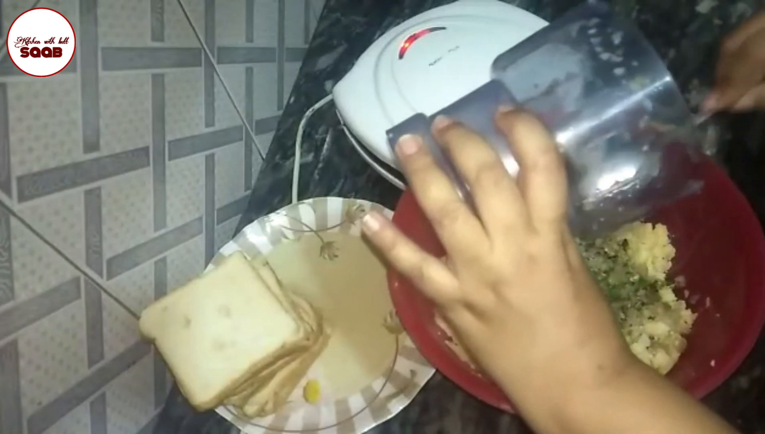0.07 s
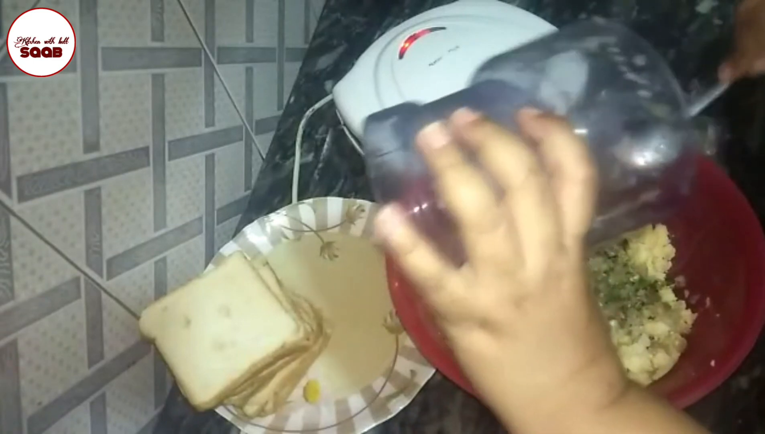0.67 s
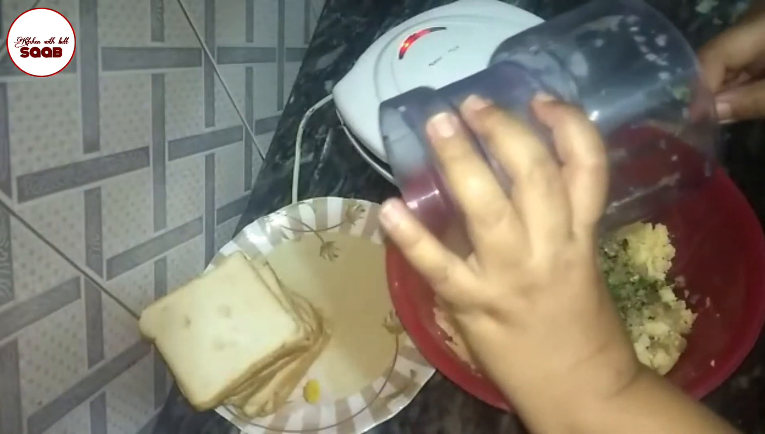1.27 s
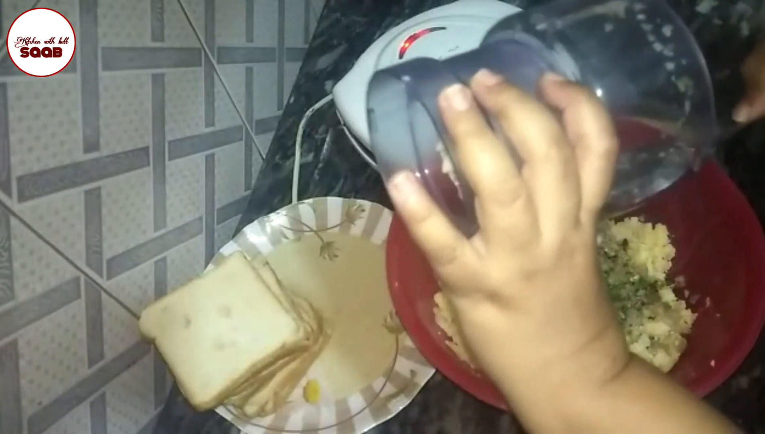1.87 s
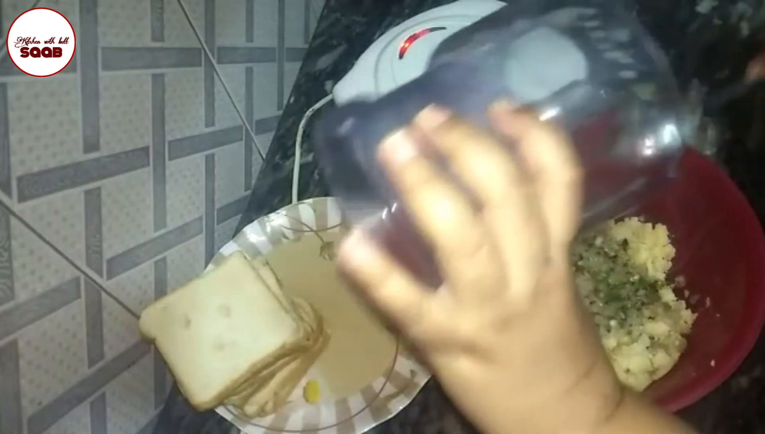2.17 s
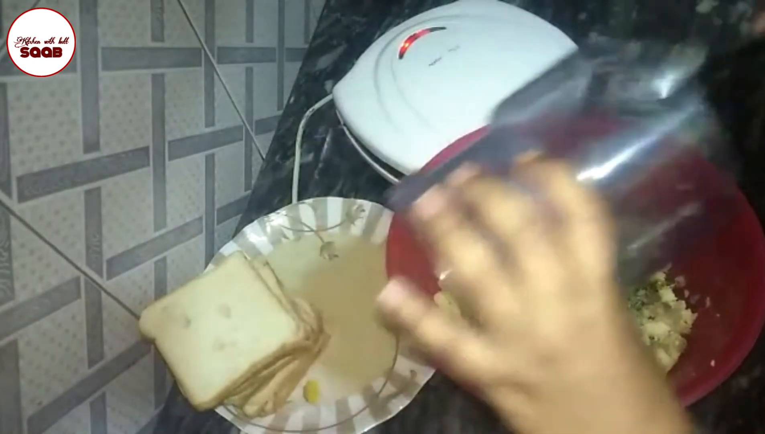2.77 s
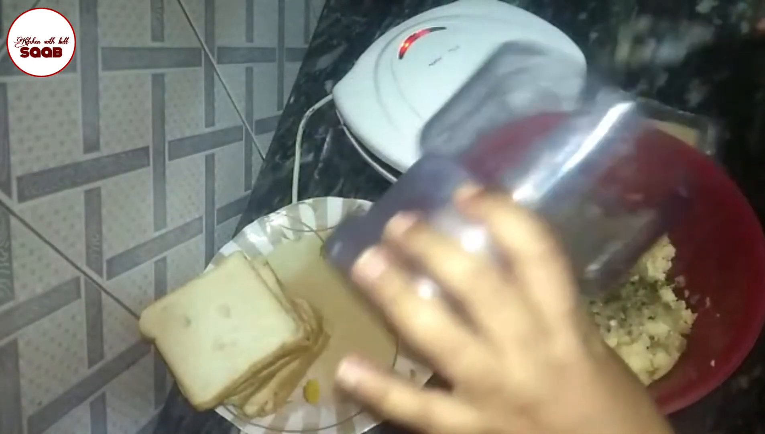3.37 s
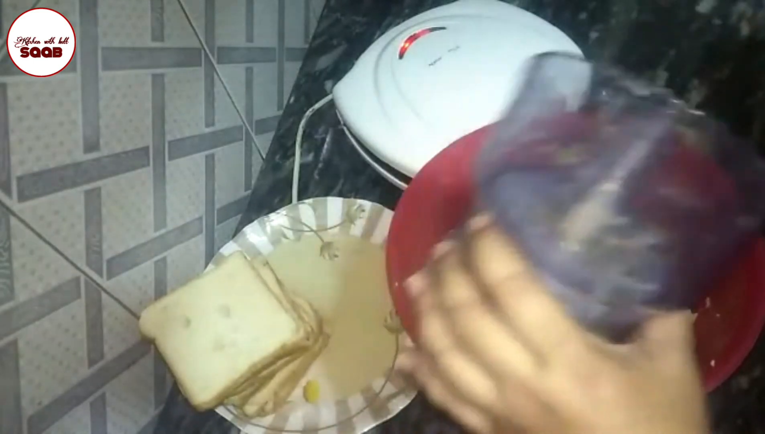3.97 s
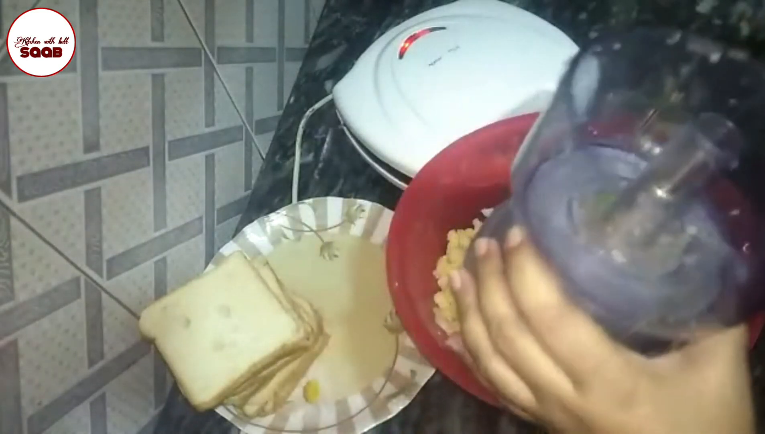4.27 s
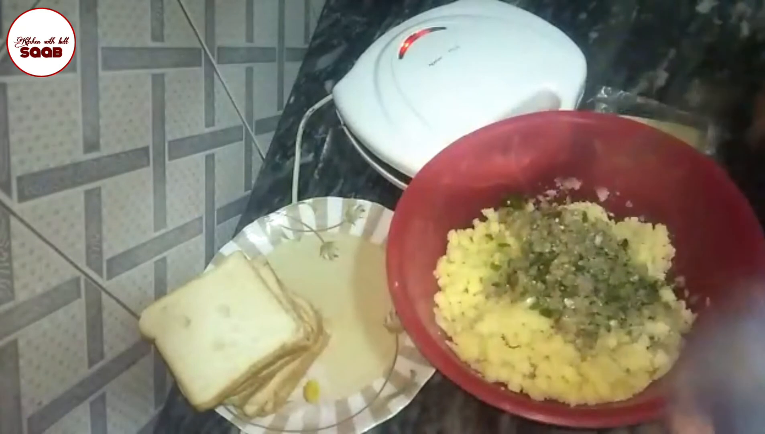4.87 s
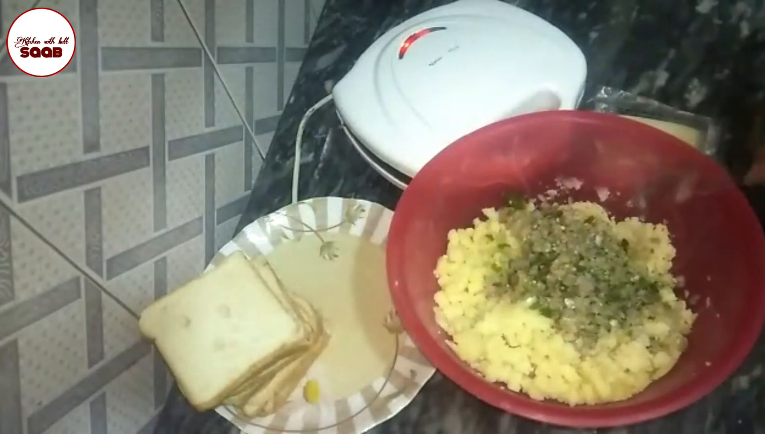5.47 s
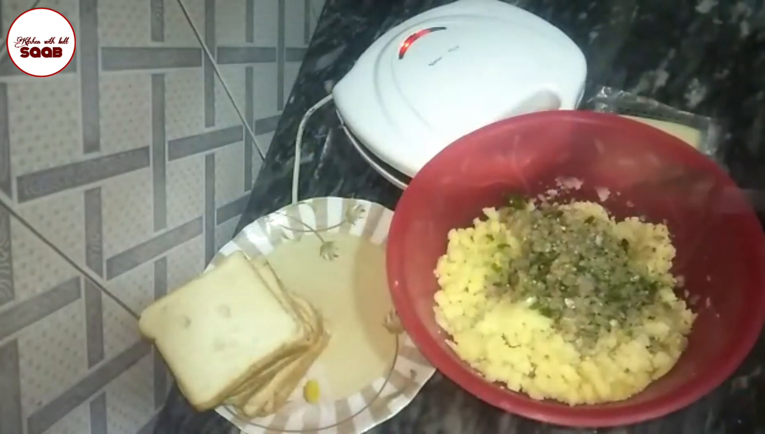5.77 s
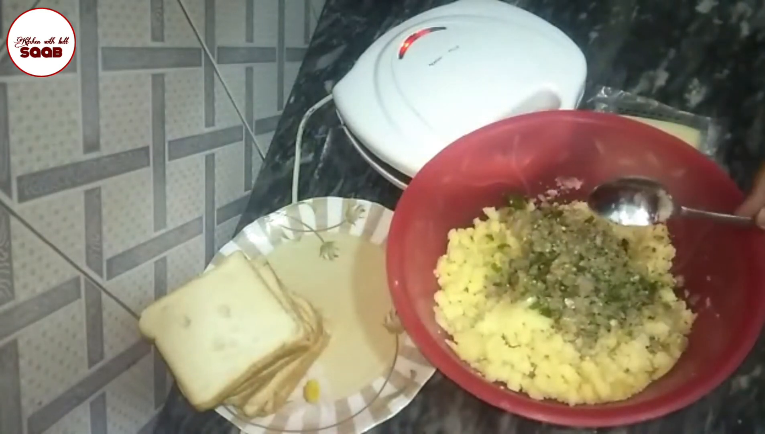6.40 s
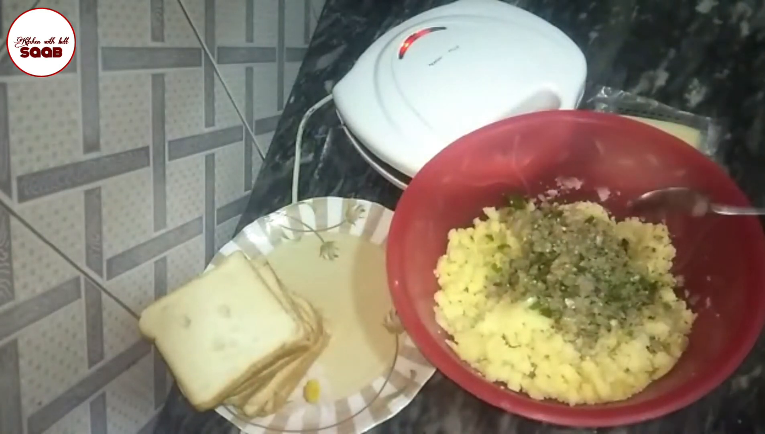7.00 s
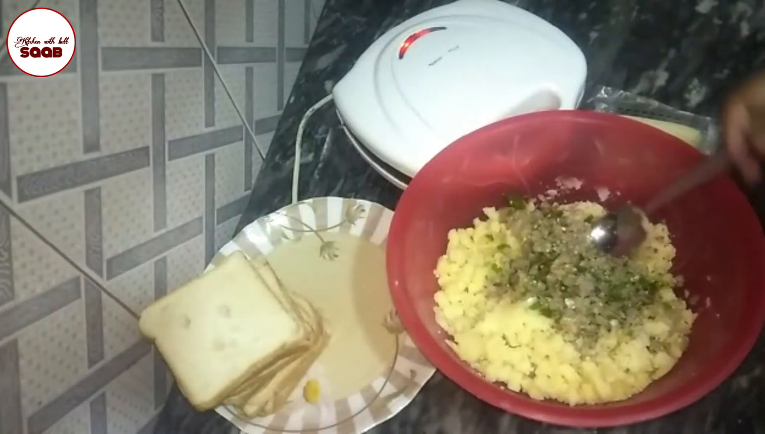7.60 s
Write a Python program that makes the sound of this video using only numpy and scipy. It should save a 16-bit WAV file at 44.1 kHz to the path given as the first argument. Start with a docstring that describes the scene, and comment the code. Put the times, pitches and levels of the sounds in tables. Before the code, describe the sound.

Over a soft hum, a metal spoon clicks and scrapes in a plastic jar, followed by a quick run of hollow knocks.

```python
"""A small tiled kitchen hums throughout. A steel spoon scrapes and clicks inside a plastic blender
jar, scooping paste into a bowl; near 3 s it clacks on the jar's lip and squeaks. From 5 s the jar is
knocked down six times to shake the rest loose, rebounding after each blow. Its rim taps, two more
knocks follow, and one faint scrape ends the scene. The right microphone port (its opening) is
covered, so that side sounds dull."""
import sys
import numpy as np
from scipy import signal
from scipy.fft import rfft, irfft, next_fast_len
from scipy.io import wavfile

SR = 44100
rng = np.random.default_rng(int(sys.argv[2]) if len(sys.argv) > 2 else 0)


def master_out(mix):
    """Clip the mix to full scale and print it as 16-bit PCM to the path in sys.argv[1]."""
    frames = np.transpose(np.atleast_2d(mix))
    ceiling = np.clip(frames, -1, 1)
    pcm = np.round(ceiling * 32767).astype(np.int16)
    wavfile.write(sys.argv[1], SR, pcm)


N = 336924


def from_db(db):
    """Turn decibels into a number to multiply by."""
    return 10 ** (np.asarray(db) / 20)


def rms_one(x):
    """Scale a signal so its average power is one."""
    return x / np.sqrt(np.mean(x ** 2) + 1e-20)


def at_hz(points, hz):
    """Read between a table's rows, giving every octave equal room."""
    pitches, values = np.transpose(points)
    return np.interp(np.log(np.maximum(hz, 1)), np.log(pitches), values)


def colour(x, spectrum):
    """Make each pitch louder or softer, following rows of pitch_hz, level_db."""
    size = next_fast_len(x.shape[-1])
    gain = from_db(at_hz(spectrum, np.arange(size // 2 + 1) * SR / size))
    return irfft(rfft(x, size) * gain, size)[..., :x.shape[-1]]


def lowpass(x, hz, order=1):
    """Dull a sound by turning down what lies above hz."""
    return signal.sosfilt(signal.butter(order, min(hz, SR / 2 - 100), fs=SR, output="sos"), x + 1e-18)


def delay(x, delay_s):
    """Make a sound arrive later."""
    i = np.arange(len(x))
    return np.interp(i - delay_s * SR, i, x, left=0)


def add(out, start_s, sound):
    """Mix a sound in at its start time."""
    i = max(round(start_s * SR), 0)
    out[i:i + len(sound)] += sound[:N - i]


def ring(tones, detune=0, scatter_db=1.5):
    """A struck thing's tones, varied with each touch; each falls 60 dB in its fade_s."""
    out = np.zeros(SR // 2)
    for hz, level_db, fade_s in tones:
        t = np.arange(min(int(fade_s * SR), len(out))) / SR
        strength, shift = rng.standard_normal(2)
        loudness = from_db(level_db + scatter_db * strength - 60 * t / fade_s)
        out[:len(t)] += loudness * np.cos(2 * np.pi * hz * (1 + detune * shift) * t)
    return out * np.cos(np.linspace(0, np.pi / 2, len(out)))


def burst(spectrum, fade_s, size=2048):
    """Overtones too many to count, made as a quickly dying puff of noise."""
    fade = from_db(-60 * np.arange(size) / SR / fade_s)
    noise = rfft(rng.standard_normal(size) * fade)
    even = irfft(noise / (np.abs(noise) + 1e-9), size) * np.sqrt(fade)   # evens out the pitches
    return colour(np.pad(even, (0, SR // 2 - size)), spectrum) * np.linspace(1, 0, SR // 2)


def wander(width_hz):
    """A smooth random wobble, as complex numbers; wider means faster."""
    smoothing = signal.butter(2, width_hz / 2, fs=SR, output="sos")
    slow = signal.sosfilt(smoothing, rng.standard_normal((2, N + SR)))[:, SR:]
    return (rms_one(slow[0]) + 1j * rms_one(slow[1])) / np.sqrt(2)


def wavering_tone(cycles, width_hz):
    """A tone of unsteady strength and pitch; cycles counts its vibrations so far."""
    return rms_one((wander(width_hz) * np.exp(2j * np.pi * cycles)).real)


def slips(size, per_s, spread_db):
    """Sticking and slipping: tiny random kicks of uneven strength."""
    chance, sign, strength = rng.random(size), rng.choice([-1, 1], size), rng.standard_normal(size)
    return (chance < per_s / SR) * sign * from_db(spread_db * strength)


# Mains hum (first row), then the fan's tones: pitch_hz, width_hz, level_db
HUM_TONES = [(100.1, 0.58, -44), (121.3, 7.1, -48.5), (175.5, 9.6, -42), (287.6, 10, -51.5),
             (320.8, 10.7, -46.5)]
# The rush of the kitchen's air: pitch_hz, level_db_per_hz
AIR_SPECTRUM = [(30, -66), (50, -75), (65, -76.5), (90, -73), (130, -65), (190, -69.5), (310, -65.5),
                (450, -76.5), (720, -73.5), (1500, -82), (2200, -83.5), (5500, -100), (8200, -99),
                (10000, -117)]


def kitchen_hum(fall_start_s=2.06, fall_length_s=0.17, fall_db=5.5, side_db=-9, waver=0.35):
    """Mains electricity hums, air rushes softly, and a fan's drone settles to a lower level."""
    t = np.arange(N) / SR
    (mains_hz, mains_width_hz, mains_db), *fan_tones = HUM_TONES
    swell = 1 + waver * wander(mains_width_hz).real
    mains = from_db(mains_db) * rms_one(swell * np.sin(2 * np.pi * mains_hz * t))
    fan = sum(from_db(db) * wavering_tone(hz * t, width_hz) for hz, width_hz, db in fan_tones)
    settled = np.clip((t - fall_start_s) / fall_length_s, 0, 1)
    middle, side = colour(rng.standard_normal((2, N)), AIR_SPECTRUM) * np.sqrt(SR / 2)
    air = middle + from_db(side_db) * side * [[1], [-1]]
    return mains + fan * from_db(-fall_db * settled) + air


# The clear tones of the jar's wall: pitch_hz, level_db, fade_s
WALL_TONES = [(842, -30.5, 0.039), (944, -28, 0.028), (975, -60, 0.05237), (1460, -34, 0.048),
              (2455, -26, 0.043), (3470, -10, 0.023), (3950, -16, 0.017), (4880, -22.5, 0.037),
              (5390, -14.5, 0.025), (6800, -90, 0.021), (7770, -19.5, 0.047), (8540, -27, 0.065)]
# The wall's crowd of short overtones: pitch_hz, level_db
WALL_SPECTRUM = [(200, -26), (550, -14), (1000, -2), (1500, -4), (2000, 3), (2500, -2.5), (3400, 12),
                 (5000, 4), (6500, 8.5), (8500, 3.5), (10500, -9), (16000, -6)]


def jar_wall(tones_db, detune, burst_s):
    """The thin wall answers one kick; every spot rings a little differently."""
    return from_db(tones_db) * ring(WALL_TONES, detune) + burst(WALL_SPECTRUM, burst_s)


# The spoon drawn along the wall: start_s, length_s, level_db
SCRAPES = [(0.0, 0.035, -41.5), (0.25, 0.39, -51), (0.312, 0.043, -37.5), (0.451, 0.18, -44.5),
           (1.047, .05, -63), (1.38, 0.21, -44), (1.442, .04, -30.5), (1.464, 0.014, -26.5),
           (1.934, 0.18, -45.5), (2.045, 0.028, -38), (3.04, 0.11, -69), (7.484, 0.022, -51.5)]


def spoon_scrapes(press_s=0.014, release_s=0.03, grit_db=1.5, catch_db=1.5):
    """Pressure builds, holds and lets go while fine slips, catching and freeing, shake the wall."""
    out = np.zeros(N)
    kicks = slips(N, per_s=3200, spread_db=4)
    force = rms_one(kicks * from_db(grit_db * wander(200).real + catch_db * wander(54).real))
    for start_s, length_s, level_db in SCRAPES:
        rub = force[max(round(start_s * SR), 0):][:SR // 3]
        t = np.arange(len(rub)) / SR
        pressure = np.clip(t / press_s, 0, 1) * np.clip(1 - (t - length_s) / release_s, 0, 1)
        wall = jar_wall(tones_db=-11, detune=0.0375, burst_s=0.045)
        scrape = signal.fftconvolve(rub * pressure, wall / np.linalg.norm(wall))
        add(out, start_s, from_db(level_db) * scrape)
    return out


def stutter(length_s):
    """The push of a landing spoon: a dying run of slips."""
    t = np.arange(SR // 20) / SR
    return slips(len(t), per_s=4600, spread_db=2.0) * np.exp(-(t / length_s) ** 2)


# The spoon hitting the wall: start_s, level_db, stutter_s, brightness_db
SPOON_HITS = [(0.199, 9.5, 0.014, -2.5), (0.2214, 7, 0.013, -10), (0.232, 1, 0.012, -11),
              (0.247, 3, 0.0033, -26), (0.9972, 9, 0.006, -5), (1.213, -12.5, 0.0085, -1),
              (1.321, -8, 0.0077, -23), (1.396, -7.5, 0.0017, -40), (1.418, -1, 0.0025, -30),
              (1.492, 9.5, 0.0017, 1.5), (1.8857, 10.5, 0.005, 1.5), (1.9025, 5, .014, -4.5),
              (2.101, -3, 0.005, 20), (3.005, -7, 0.016, -53)]


def spoon_clicks(thud_hz=1200, treble_hz=4500, thud_db=3.5, thud_per_dull_db=0.45):
    """The spoon lands on the wall: its bare edge clicks brightly, but cushioned by paste it thuds."""
    out = np.zeros(N)
    for start_s, level_db, stutter_s, brightness_db in SPOON_HITS:
        wall = jar_wall(tones_db=-5, detune=0.028, burst_s=0.036)
        click = signal.fftconvolve(stutter(stutter_s), wall)
        thud = lowpass(click, thud_hz, order=2)
        treble = click - lowpass(click, treble_hz)
        thud_gain = from_db(thud_db - thud_per_dull_db * brightness_db)
        click = click + (thud_gain - 1) * thud + (from_db(brightness_db) - 1) * treble
        add(out, start_s, from_db(level_db) * click / np.linalg.norm(click))
    return out


# The clear tones of the jar's lip: pitch_hz, level_db, fade_s
LIP_TONES = [(1110, -15, 0.041), (2050, 3.5, 0.052), (2490, -1, 0.028), (3340, -3, 0.021), (5340, 1, 0.02),
             (6540, 3, 0.013)]
# The lip's crowd of short overtones: pitch_hz, level_db
LIP_SPECTRUM = [(200, -5), (600, 29), (1000, 23), (2100, 37.5), (3500, 18), (6000, 34), (8500, 21),
                (10500, -7), (16000, -14)]


def lip_clack(start_s=3.023, level_db=6):
    """On its way out the spoon hits the stiff lip: a lower, drier clack."""
    out = np.zeros(N)
    push = stutter(length_s=0.0037)
    clack = signal.fftconvolve(push, ring(LIP_TONES) + burst(LIP_SPECTRUM, fade_s=0.023))
    add(out, start_s, from_db(level_db) * clack / np.linalg.norm(clack))
    return out


def spoon_squeak(start_s=3.141, length_s=0.044, level_db=-31, pitch_hz=7430, fall_hz_per_s=43000):
    """The slips of the spoon's edge lock into a rough, falling whistle that swells and dies."""
    t = np.clip(np.arange(N) / SR - start_s, 0, length_s)
    hz = pitch_hz - fall_hz_per_s * t
    whistle = wavering_tone(np.cumsum(hz) / SR, width_hz=1689.5)
    return whistle * from_db(level_db) * np.sin(np.pi * t / length_s) ** 2


# The noise of jar meeting counter: pitch_hz, level_db
CRACK_SPECTRUM = [(60, 8.5), (300, 27), (600, 18), (1000, 19.5), (1400, 5), (2000, 14.5), (2700, 9.5),
                  (3500, 15.5), (5000, 11), (8500, 14), (10500, -1), (16000, -3)]


def jar_crack(fade_s):
    """The sharp crack at the moment the jar lands."""
    return burst(CRACK_SPECTRUM, fade_s)


# The jar knocked down: start_s, level_db, rebound_after_s, rebound_db
JAR_BLOWS = [(4.9712, -11, .012, -15.5), (5.1512, 0, 0.039, -14.5), (5.3515, 0.5, 0.035, -6.5),
             (5.5178, 0, 0.028, -7), (5.696, 0, 0.028, -10), (5.8572, -2, .0355, -10.5),
             (6.8065, 0, 0.039, -8), (7.0299, -1, .027, -9.5)]
# The tones of the jar's base and the counter: pitch_hz, level_db, fade_s
BASE_TONES = [(95.3, -23, 0.24), (121.9, -21.5, 0.36), (175, -39.5, 0.96), (207, -27, 0.11),
              (283.7, -26, 0.36), (307, -28.5, 0.55), (407, -59, 0.059), (558.6, -30, 0.39),
              (588, -28.5, .2), (709, -11, 0.059), (730, -17.5, 0.058), (780, -9.5, 0.043),
              (928, -22, 0.063), (1018, -20, 0.036), (1550, -55, 0.013), (1830, -25.5, 0.052),
              (2030, -34, 0.025), (3250, -29, 0.025)]


def jar_knocks(crack_db=0.5, top_hz=13200, top_hz_per_db=620, rebound_hz=1000, rebound_crack_db=9):
    """A crack, brighter for harder blows, and a hollow thump; then a softer, duller rebound."""
    out = np.zeros(N)
    for start_s, level_db, rebound_after_s, rebound_db in JAR_BLOWS:
        crack = lowpass(jar_crack(fade_s=0.026), top_hz + top_hz_per_db * level_db, order=2)
        thump = ring(BASE_TONES, detune=0.0062)
        add(out, start_s, from_db(level_db) * (from_db(crack_db) * crack - thump))
        rebound = from_db(rebound_crack_db) * jar_crack(fade_s=0.012) - ring(BASE_TONES, detune=0.03)
        add(out, start_s + rebound_after_s, from_db(rebound_db) * lowpass(rebound, rebound_hz, order=2))
    return out


# The tones of the jar's free rim: pitch_hz, level_db, fade_s
RIM_TONES = [(548, -35, 0.3), (593, -20.5, 0.15), (665, -23, 0.32), (726, -13, 0.064), (887, -13, 0.095),
             (920, -25, 0.04536), (2260, -19, 0.056), (2520, -25, 0.11), (3020, -16, 0.038),
             (3770, -34, .04), (3940, -42, 0.0633), (6290, -23, 0.042)]


def rim_tap(start_s=6.624, crack_db=-2.5, ring_db=3, again_after_s=0.019, again_db=-8):
    """Landing on its edge, the jar cracks lightly; its rim rings and touches once more."""
    out = np.zeros(N)
    tap = from_db(crack_db) * jar_crack(fade_s=0.019) + from_db(ring_db) * ring(RIM_TONES)
    add(out, start_s, lowpass(tap, hz=9500, order=2))
    second_touch = lowpass(ring(RIM_TONES, detune=0.018), hz=1000, order=2)
    add(out, start_s + again_after_s, from_db(ring_db + again_db) * second_touch)
    return out


def tile_echo(x, left_s=0.004947, right_s=0.00369, echo_db=-4, echo_hz=2000):
    """Each port hears the sound plus its own quick echo off the nearby tiles."""
    echo = from_db(echo_db) * lowpass(x, echo_hz)
    return x + np.array([delay(echo, left_s), delay(echo, right_s)])


# How long the kitchen rings, before fade_limits_s is applied: pitch_hz, fade_s
ROOM_FADES = [(100, -0.55), (400, 0.63), (900, .5), (2000, 0.5), (6000, 0.6), (15000, 0.33)]
# How strongly the kitchen rings: pitch_hz, level_db
ROOM_SPECTRUM = [(60, -41), (125, -4.5), (300, 2), (700, -3.5), (1300, -4.5), (3000, -9.5), (8000, -11),
                 (15000, -12)]


def kitchen_reverb(x, first_s=0.012, build_s=0.00085, alike=0.33, fade_limits_s=(0.15, 0.7)):
    """Countless echoes blur into a tail, partly alike at both ports; each octave dies at its own pace."""
    t = np.arange(SR) / SR
    noise = rng.standard_normal((2, SR))
    noise[1] = alike * noise[0] + np.sqrt(1 - alike ** 2) * noise[1]
    spectrum = rfft(colour(noise, ROOM_SPECTRUM))
    centres_hz = 2. ** np.arange(6, 15)
    octave = np.log2(np.clip(np.arange(spectrum.shape[1]), centres_hz[0], centres_hz[-1]))
    tail = 0
    for hz in centres_hz:
        fade_s = np.clip(at_hz(ROOM_FADES, hz), *fade_limits_s)
        fade = np.clip((t - first_s) / build_s, 0, 1) * from_db(-60 * t / fade_s)
        band = irfft(spectrum * np.maximum(1 - abs(octave - np.log2(hz)), 0), SR)
        tail = tail + band * fade / np.linalg.norm(fade)
    return signal.fftconvolve(x[None], tail, axes=1)[:, :N]


def one_direction():
    """The spoon's sounds and the jar's blows; each direction gets its own mix of overtones."""
    return spoon_clicks() + lip_clack() + spoon_scrapes() + spoon_squeak(), jar_knocks() + rim_tap()


def scene(spoon_right_db=-9, spoon_room_db=-5, blows_room_db=-5.5, hum_right_db=-0.55):
    """The spoon works near the left port; sound sent towards the ports and away fills the room."""
    towards, away = one_direction(), one_direction()
    room = sum(kitchen_reverb(from_db(spoon_room_db) * spoon + from_db(blows_room_db) * blows)
               for spoon, blows in (towards, away))
    spoon, blows = towards
    hum = kitchen_hum() * from_db([[0], [hum_right_db]])
    return spoon * from_db([[0], [spoon_right_db]]) + tile_echo(blows) + room + hum


def record(dry, cover_hz=540, cover_top_hz=9000, cover_db=-3.5, hiss_db=-74, bass_hz=64, top_hz=15650):
    """The covered right port is dull; both hiss, lose deep bass and top treble, and round off peaks."""
    right = from_db(cover_db) * lowpass(lowpass(dry[1], cover_hz), cover_top_hz)
    bass_cut = signal.butter(4, bass_hz, "high", fs=SR, output="sos")
    ports = signal.sosfilt(bass_cut, np.array([dry[0], right]))
    ports = ports + from_db(hiss_db) * rng.standard_normal((2, N))
    top_cut = signal.ellip(10, 0.1, 80, top_hz, fs=SR, output="sos")
    ceiling = 0.85
    rounded = ceiling * np.tanh(signal.sosfilt(top_cut, ports) / ceiling)
    return signal.sosfilt(top_cut, rounded)


dry = scene()
out = record(dry)
master_out(out)
```